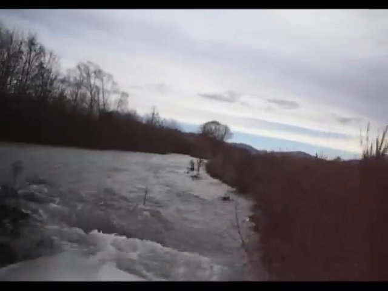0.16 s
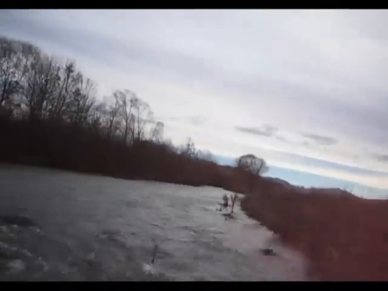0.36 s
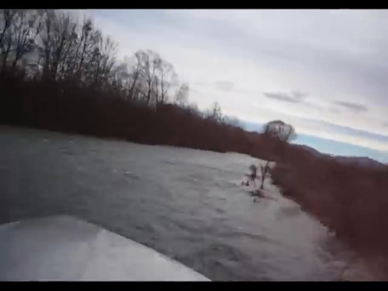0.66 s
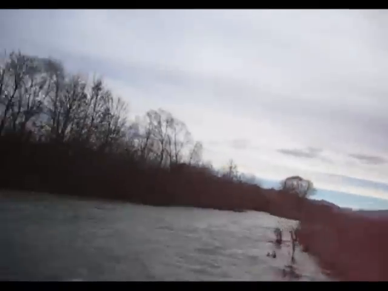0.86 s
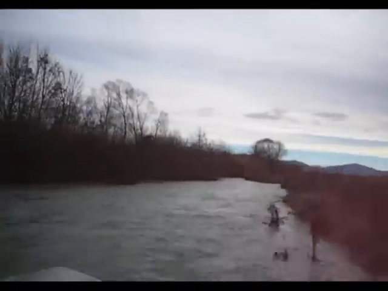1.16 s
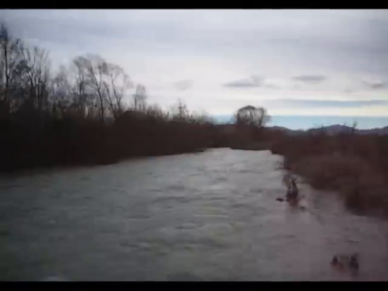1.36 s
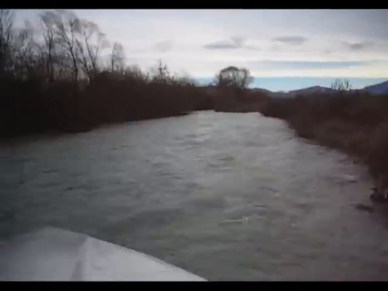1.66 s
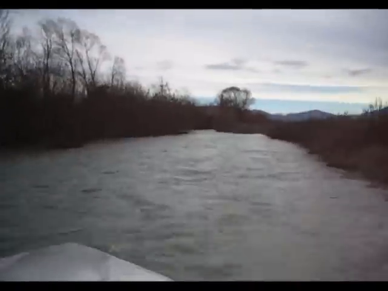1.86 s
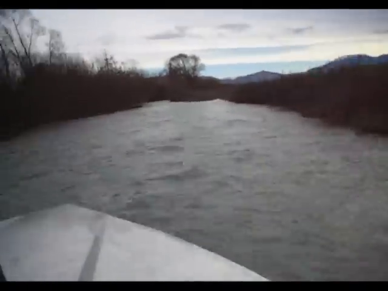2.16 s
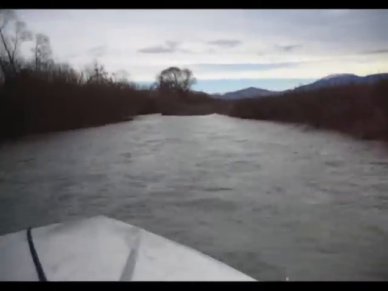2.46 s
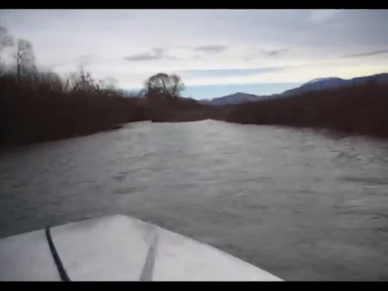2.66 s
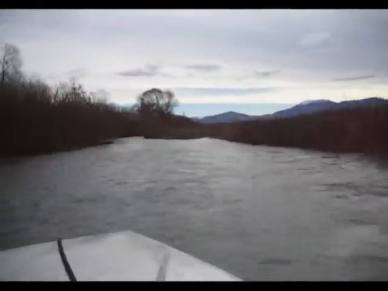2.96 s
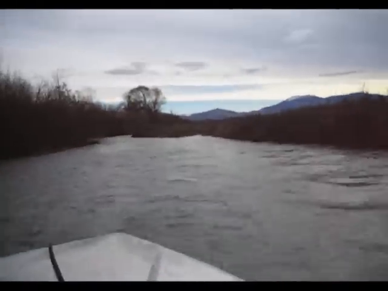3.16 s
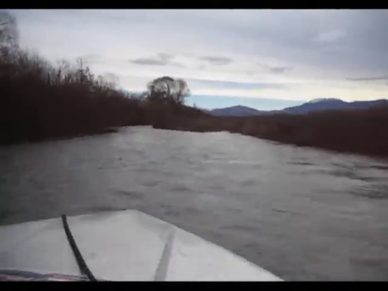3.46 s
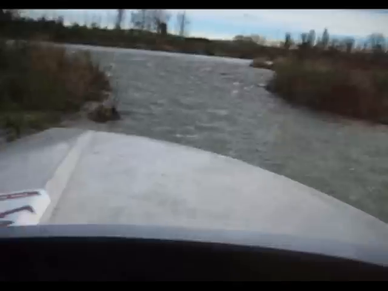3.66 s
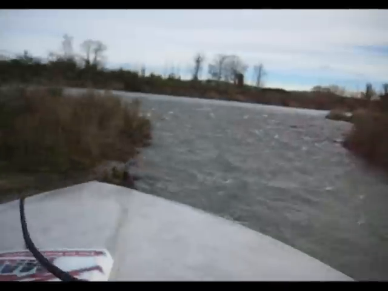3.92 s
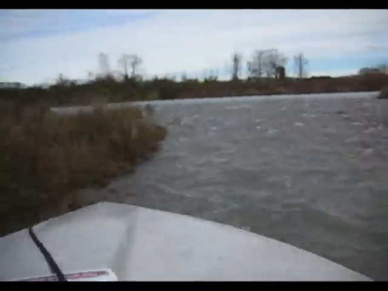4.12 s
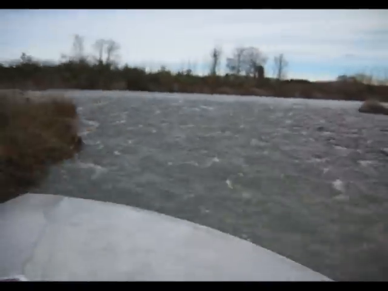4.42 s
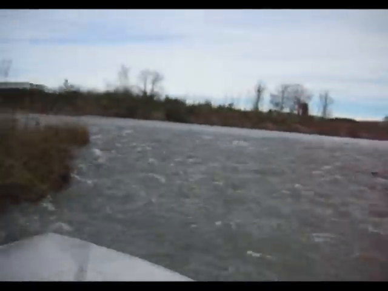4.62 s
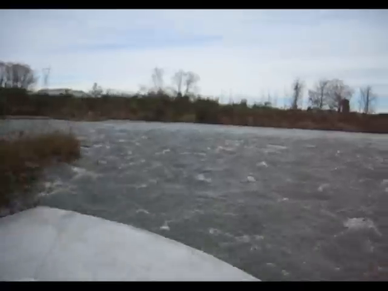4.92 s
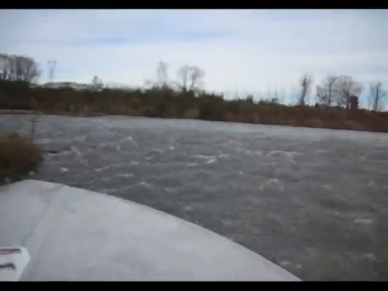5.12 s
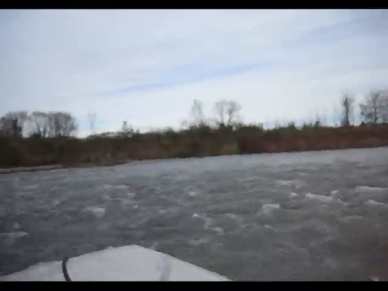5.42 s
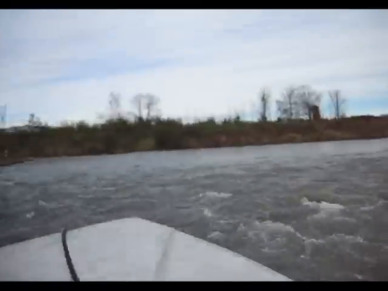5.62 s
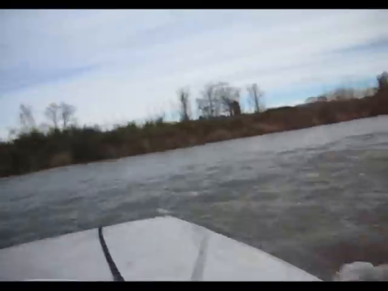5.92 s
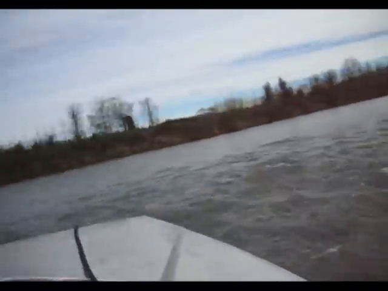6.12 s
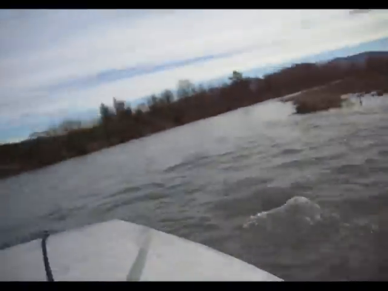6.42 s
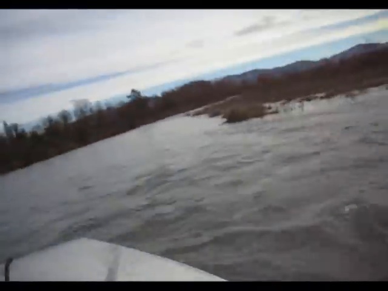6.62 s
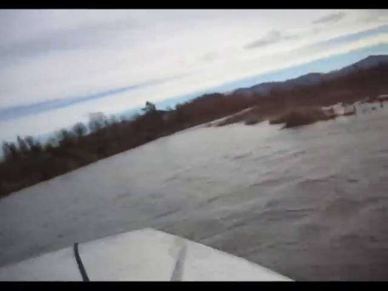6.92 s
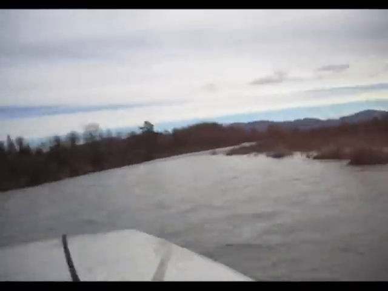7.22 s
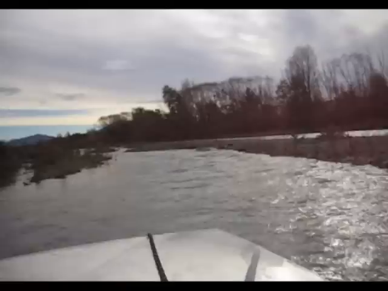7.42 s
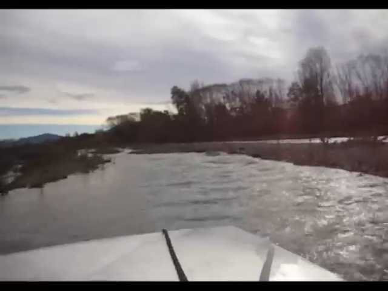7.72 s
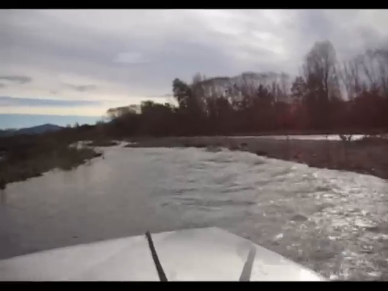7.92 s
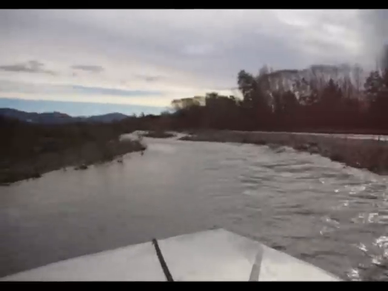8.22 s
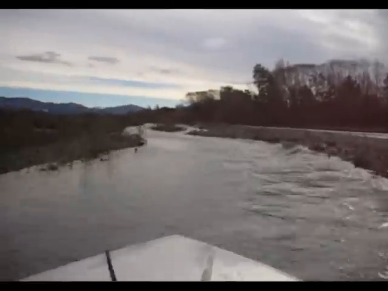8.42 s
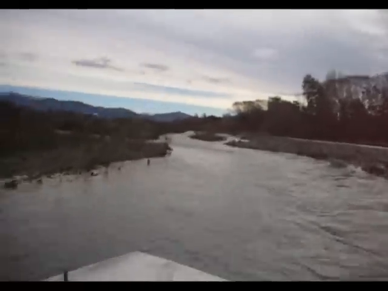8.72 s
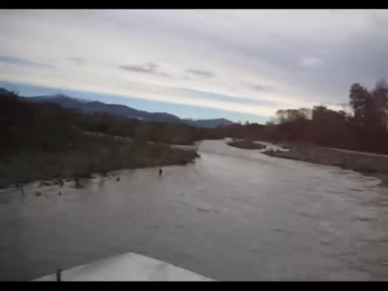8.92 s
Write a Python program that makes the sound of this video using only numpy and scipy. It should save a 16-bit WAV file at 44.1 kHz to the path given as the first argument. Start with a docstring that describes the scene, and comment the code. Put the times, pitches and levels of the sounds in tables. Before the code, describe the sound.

From an open cockpit, a V8 jet boat engine surges and falls in three abrupt shots, with whining impeller, rushing spray and overloaded thumps.

```python
"""A V8 growl holds, then climbs: a jet boat on a river, heard from its cockpit, in three shots with silent gaps.
Crank orders ring exhaust and hull; impeller blades whine; gas roars and rasps in a puff at each firing.
Spray hisses, wind and chop buffet the microphone as slow low noise, and the hull slams with a push and a splash.
Capsule and amplifier overload into flat tops when the sound is loud."""
import sys
import numpy as np
from scipy import signal
from scipy.fft import rfft, irfft, next_fast_len
from scipy.io import wavfile
from scipy.ndimage import uniform_filter1d

SR = 44100
rng = np.random.default_rng(int(sys.argv[2]) if len(sys.argv) > 2 else 0)


def master(y):
    """Save y as 16-bit WAV."""
    cut = np.clip(np.atleast_2d(y).T, -1, 1)
    pcm = np.round(cut * 32767)  # scale
    wavfile.write(sys.argv[1], SR, pcm.astype(np.int16))


N = 400428


def undb(db):
    """Amplitude factor of a level in dB."""
    return 10 ** (np.asarray(db) / 20)


def unit(x):
    """Scale to rms 1."""
    return x / np.sqrt(np.mean(x ** 2))


def walk(rate_hz):
    """Random levels, each held 1 / rate_hz seconds, smoothed twice; rms 1."""
    hold = int(SR / rate_hz)
    held = np.repeat(rng.standard_normal(N // hold + 1), hold)
    smooth = uniform_filter1d(uniform_filter1d(held, hold), hold)
    return unit(smooth[:N])


def coloured(spectrum, shared_db, own_db, rate_hz):
    """Noise of the given spectrum, rms 1, in octave-wide pieces that swell together and flicker alone."""
    hz, db = np.transpose(spectrum)
    size = next_fast_len(N)
    octave = np.log2(np.maximum(np.fft.rfftfreq(size, 1 / SR), 1))
    edges = np.log2(np.r_[hz[0] / 2, hz, hz[-1] * 2])
    shape_db = np.interp(octave, edges, np.r_[-60, db, -60])
    noise = rfft(rng.standard_normal(size)) * undb(shape_db)
    out, swell = 0, walk(rate_hz / 2)
    for centre in np.arange(np.floor(edges[0]), edges[-1] + 1):
        band = np.clip(1 - abs(octave - centre), 0, 1)
        piece = irfft(noise * band, size)[:N]
        out = out + piece * undb(shared_db * swell + own_db * walk(rate_hz))
    return unit(out)


def spans(t, rows):
    """Sum in dB of stretches (start_s, end_s, change_db) with 30 ms ramps inside their ends."""
    ramp_s = .03
    return sum(db * np.clip(np.minimum(t - start, end - t) / ramp_s, 0, 1) for start, end, db in rows)


def speed_slope(crank_hz):
    """Smoothed gain of crank speed, Hz per second."""
    return uniform_filter1d(np.gradient(crank_hz) * SR, size=2000)


# course of each shot: start_s, crank_hz, roar_db (less 1 dB when played), spray_db (plus 11 dB when played)
COURSE_1 = [(0.0, 59.9, -22, -40), (0.3, 60.34, -21.5, -40.5), (0.415, 62.96, -18.5, -35.5),
            (0.53, 74.56, -16.5, -32.5), (0.62, 78.3, -16.5, -30), (0.7, 80.3, -19.5, -28),
            (0.94, 82.33, -22.5, -28), (1.24, 81.74, -17, -30), (1.36, 57.64, -20, -43),
            (1.5, 40.24, -26, -44), (1.61, 36.8, -33, -44.5), (1.8, 51.04, -25.5, -44.5),
            (1.96, 54, -18, -39), (2.17, 49.9, -22.5, -40), (2.58, 48.52, -21.5, -41),
            (3.58, 49.8, -24, -39.5)]
COURSE_2 = [(3.73, 60.95, -22.5, -35), (4.0, 67.03, -15, -33.5), (4.13, 60.1, -15, -37),
            (4.23, 54.67, -26, -42), (4.72, 56.4, -20, -38.5), (4.8, 64.43, -17, -36.5),
            (4.87, 71.63, -14, -35.5), (4.971, 76.64, -17, -30.5), (5.1, 79.67, -22, -29.5),
            (5.3, 81.46, -16.5, -24.5), (5.36, 87.34, -15, -30.5), (5.44, 86.4, -15.5, -28.5),
            (5.55, 78.34, -18, -29.5), (5.6, 73.7, -20.5, -35.5), (5.69, 61.12, -23.5, -41),
            (5.87, 58.64, -22.5, -38), (6.04, 71.37, -14.5, -32), (6.13, 75.37, -14.5, -31.5),
            (6.3, 80.62, -15.5, -26.5), (6.55, 82.63, -15.5, -29.5), (6.66, 71.96, -13.5, -33),
            (6.77, 61.5, -13.5, -33.5), (6.9, 60.66, -17.5, -36.5), (7.07, 71.17, -13, -31),
            (7.16, 74.13, -15, -28), (7.3, 77.07, -19.5, -32), (7.39, 75.93, -21, -31.5)]
COURSE_3 = [(7.525, 54.87, -21, -38.5), (7.8, 53.86, -23, -38.5), (8.3, 53.78, -21, -39),
            (9.08, 53.06, -24, -40.5)]


def course(t):
    """Crank speed and the levels of gas roar and spray, interpolated over time."""
    start_s, *columns = np.transpose(COURSE_1 + COURSE_2 + COURSE_3)
    return [np.interp(t, start_s, column) for column in columns]


# tone levels over engine speed, before the changes below:
# crank_hz, shaft_shake_db, firing_db, impeller_db, impeller_third_harmonic_db, hull_drumming_db, intake_snarl_db
TONES_BY_SPEED = [(37.6, -37.5, -31, -25.5, -40, -23.5, -42), (48, -37, -21, -24, -43, -27, -39),
                  (48.62, -27.5, -23, -23.5, -26.5, -32, -32), (53.2, -22, -26.5, -29, -30.5, -31, -34),
                  (60.9, -31.5, -32, -28.5, -27.5, -22.5, -29.5),
                  (69.1, -18.5, -24.5, -22.5, -30, -23, -25), (74.2, -24, -26.5, -22.5, -33, -24, -24),
                  (76.7, -19.5, -17, -26.5, -28, -26.5, -26.5), (81, -24, -8, -29, -25.5, -31.5, -27),
                  (85.8, -20.5, -11.5, -20.5, -30.5, -30, -34)]
# firing tone sinks, or stands out (negative): start_s, end_s, drop_db
FIRING_DROPS = [(1.242, 1.65, 23), (1.65, 1.949, 9), (3.72, 4.03, 6), (4.078, 4.17, -10), (0.43, 0.5, -4),
                (4.72, 4.87, -7), (5.38, 5.483, -3), (5.51, 5.6, 6), (5.585, 5.799, 11), (6.536, 6.9, 19),
                (7.06, 7.4, 10), (7.5, 8.7, 1.5)]
# impeller tone stands out or sinks: start_s, end_s, rise_db
IMPELLER_SINGS = [(-0.03, 0.34, 6), (1.85, 2.202, -7), (3.3, 3.6, 3.5), (5.28, 5.52, -9),
                  (0.51, 0.63, 11.5), (1.642, 1.831, 10), (2.2, 2.5, 5.5), (3.74, 3.95, 4),
                  (2.85, 3.15, -3), (8.78, 9.11, -7), (7.5, 8.5, 5.5)]
# its third harmonic stands out or sinks: start_s, end_s, rise_db
WHINE_SINGS = [(0, 0.45, -4), (0.62, 1.235, 4.5), (5.62, 5.95, -5), (1.65, 2.2, -4), (2.301, 2.75, 1.5),
               (3.299, 3.599, -5.5), (3.851, 4.05, 6.5), (4.15, 4.7, -2.5), (7.5, 8.08, -3),
               (8.1, 8.468, 9), (8.5, 9.08, -3)]
PULL_DB, PULL_HZ_PER_S = 5, 72  # full rise of the firing tone, and the speed gain that brings it
SWELL_DB, SWELLS_PER_S = 1.0, 6


def tone_levels(t, crank_hz):
    """Levels in dB of six tones or groups set by engine speed; listed spans and speed gain shift firing."""
    speed_hz, *laws = np.transpose(TONES_BY_SPEED)
    shake_db, firing_db, impeller_db, whine_db, drum_db, snarl_db = (
        np.interp(crank_hz, speed_hz, law) for law in laws)
    pull_db = PULL_DB * np.clip(speed_slope(crank_hz) / PULL_HZ_PER_S, 0, 1)
    firing_db = firing_db + pull_db - spans(t, FIRING_DROPS)
    impeller_db = impeller_db + spans(t, IMPELLER_SINGS)
    whine_db = whine_db + spans(t, WHINE_SINGS)
    # these get an extra slow random swell, the firing does not
    shake_db, impeller_db, whine_db, drum_db, snarl_db = (
        db + SWELL_DB * walk(SWELLS_PER_S) for db in (shake_db, impeller_db, whine_db, drum_db, snarl_db))
    return shake_db, firing_db, impeller_db, whine_db, drum_db, snarl_db


def tone(turns, order, flutter_db, waver_db=1.5, wander=.35):
    """Sine at one multiple of the crank speed, wavering in level and phase."""
    phase = 2 * np.pi * (order * turns + rng.random()) + wander * np.sqrt(order) * walk(25)
    return np.sqrt(2) * np.sin(phase) * undb(waver_db * walk(12) + flutter_db * walk(40))


def main_tones(turns, slowing, flutter_db, shake_db, firing_db, impeller_db, whine_db):
    """Four firings, three impeller blades and one shaft shake a turn; their phases smear as the engine slows."""
    firing = tone(turns, 4, flutter_db, 1.5, wander=.08 + 0.3 * slowing)
    impeller = tone(turns, 3, flutter_db, 1.2, wander=0.15 + slowing)
    whine = tone(turns, 9, flutter_db, 2.0, wander=0.17 + slowing)
    shake = tone(turns, 1, flutter_db, 0.0, wander=0.18 + slowing)
    out = undb(firing_db) * firing + undb(impeller_db) * impeller
    return out + undb(whine_db) * whine + undb(shake_db) * shake


# tones that drum the hull: crank_multiple, level_db (re drumming)
HULL_DRUM = [(2, -2.5), (2.5, -3.5)]
# intake snarl: crank_multiple, level_db (re snarl)
INTAKE_SNARL = [(5, -3), (5.5, -1), (6, -1), (6.5, -6.5)]
# other tones of the uneven eight: crank_multiple, level_db (re roar_db of the course)
UNEVEN_ORDERS = [(1.5, -13.5), (3.5, -15), (4.5, -12.5), (7, -12), (7.5, -15.5), (8, -13.5), (10, -13.5),
                 (11, -15), (12, -21), (17, -16)]
# resonances that lift passing tones: centre_hz, width_hz, lift_db
EXHAUST_RESONANCES = [(121, 59, 3), (408, 87, 3.5), (757, 27, 1)]
# single orders stand out or sink: crank_multiple, start_s, end_s, rise_db
ORDER_SINGS = [(2, 0.34, 0.432, 6.5), (5, 0.41, 0.535, 9.5), (6, 0.333, 0.45, 9), (6, 0.48, 0.63, 6),
               (5.5, 0.39, 0.72, 6), (2.5, 2.82, 3.12, 8.5), (17, 2.1, 3.6, -9), (2, 3.82, 4.04, 4),
               (5.5, 3.7, 4.0, -11), (6, 3.72, 4.1, 2.5), (8, 3.72, 4.0, 5), (12, 3.8, 4.02, 11),
               (6, -0.03, 0.3, 4), (17, -0.03, 0.4, -7), (3.5, 4.07, 4.17, 10), (7, 0.97, 1.24, 4),
               (6, 7.9, 9.11, 3), (2, 7.5, 8.8, 2.5), (10, 8.2, 9.11, 4), (7, 4.72, 5.2, -6),
               (11, 4.92, 5.12, 7), (12, 4.75, 5.0, 5), (2, 5.48, 5.66, 5.5), (7, 5.55, 5.66, 8),
               (2, 4.25, 4.45, 6), (5, 4.74, 4.86, 11), (6, 4.83, 4.97, 6), (5.5, 4.84, 5.1, 5),
               (6, 5.46, 5.6, 5), (2, 5.74, 5.97, 6), (5, 5.99, 6.24, 9), (5.5, 6.06, 6.22, 4),
               (6, 6.54, 6.61, 8.5), (4.5, 4.74, 4.9, 6), (2, 6.86, 7.0, 5.5), (5, 6.93, 7.36, 5.5),
               (6, 7.08, 7.3, 3), (2.5, 7.14, 7.34, 7.5), (2, 7.14, 7.3, 6.5), (8, 7.14, 7.4, 4.5),
               (10, 7.12, 7.3, 5.5), (11, 7.5, 9.11, -4), (2.5, 8.45, 9.08, 7.5)]


def order_tones(t, crank_hz, turns, slowing, flutter_db, drum_db, snarl_db, roar_db):
    """Crank orders of hull, intake and uneven firing, lifted as they pass exhaust resonances."""
    ragged = 0.2 + 1.2997 * slowing
    out = 0
    for orders, level_db in (HULL_DRUM, drum_db), (INTAKE_SNARL, snarl_db), (UNEVEN_ORDERS, roar_db):
        for order, db in orders:
            lift_db = sum(top / (1 + (2 * (order * crank_hz - hz) / width) ** 2)
                          for hz, width, top in EXHAUST_RESONANCES)
            sings = [row[1:] for row in ORDER_SINGS if round(2 * row[0]) == round(2 * order)]
            gain = undb(db + lift_db + spans(t, sings) + level_db - 1.7 * slowing)
            out = out + gain * tone(turns, order, flutter_db, wander=ragged)
    return out


# gas roar spectrum: freq_hz, density_db (per Hz, relative)
ROAR_SPECTRUM = [(150, -5.5), (250, -2), (400, 2.5), (550, 0), (800, -2.5), (1200, -9.5), (2000, -26),
                 (3500, -26)]
# exhaust rasp spectrum, the upper middle of the roar: freq_hz, density_db (per Hz, relative)
RASP_SPECTRUM = [(700, -8.5), (900, -5), (1400, 1.5), (2000, -4), (3000, -8)]
# exhaust rasp level: time_s, level_db
RASP_LEVEL = [(0, -36), (0.23, -41), (0.6, -27), (1.22, -27), (1.34, -40), (1.58, -56), (1.84, -50),
              (1.89, -33.5), (2.29, -41), (3.2, -39), (3.57, -32.5), (3.74, -36.5), (3.99, -34),
              (4.24, -47), (4.74, -41), (4.98, -28), (5.47, -29), (5.77, -46), (6.06, -27), (6.5, -22.5),
              (6.79, -18.5), (6.88, -29.5), (7.17, -18.5), (7.38, -29.5), (7.54, -37.5), (8.28, -35.5),
              (9.08, -40)]


def exhaust_gas(t, phase, chance, roar_db):
    """Roar and rasp: noise in puffs that start at each firing and decay, of chance strength."""
    puffs = unit((0.63 + np.exp(-phase / 0.45)) * undb(1.3 * chance))
    rasp_db = np.interp(t, *np.transpose(RASP_LEVEL))
    roar = undb(roar_db - 1.0) * puffs * coloured(ROAR_SPECTRUM, 0.75, 1.4, 20)
    rasp = undb(rasp_db) * puffs * coloured(RASP_SPECTRUM, .6, 1.9, 30)
    return roar, rasp


HUNT_SHARE = 0.003985  # rms share by which the speed hunts
UNEVEN_DB, FLUTTER_DB = 2.0, 1.23  # firing scatter before smoothing, and tone flutter, at part speed
PART_HZ, FULL_HZ = 69.6, 80.8  # crank speeds between which the firings even out


def engine(t, steady_hz, roar_db):
    """One crank angle drives tones and gas puffs; the tones' firing scatter fades near full speed."""
    shake_db, firing_db, impeller_db, whine_db, drum_db, snarl_db = tone_levels(t, steady_hz)
    crank_hz = steady_hz * (1 + HUNT_SHARE * walk(8))
    turns = np.cumsum(crank_hz) / SR
    slowing = np.clip((-speed_slope(crank_hz) - 10) / 40, 0, 1)
    part = np.interp(crank_hz, [PART_HZ, FULL_HZ], [1, 0])
    flutter_db = FLUTTER_DB * part
    tones = main_tones(turns, slowing, flutter_db, shake_db, firing_db, impeller_db, whine_db)
    tones = tones + order_tones(t, crank_hz, turns, slowing, flutter_db, drum_db, snarl_db, roar_db)
    firing, phase = np.divmod(4 * turns, 1)
    chance = rng.standard_normal(N // 50)[firing.astype(int)]
    tones = tones * undb(UNEVEN_DB * part * uniform_filter1d(chance, size=60))
    roar, rasp = exhaust_gas(t, phase, chance, roar_db)
    # near full speed the firing rate meets the cockpit's boom, which lifts all but the rasp
    boom_db = 6 / (1 + ((4 * crank_hz - 332) / 28) ** 4)
    return undb(boom_db) * (tones + roar) + rasp


# spray spectrum: freq_hz, density_db (per Hz, relative)
SPRAY_SPECTRUM = [(700, 5), (1500, 1.5), (2500, -5.5), (3300, -5), (4500, -12.5), (6000, -16),
                  (8000, -15.5), (10000, -20)]


def spray(spray_db):
    """Water hiss: flickering noise that follows the course."""
    return undb(spray_db + 11.0) * coloured(SPRAY_SPECTRUM, 1.0, 1.0, 25)


# buffet spectrum: freq_hz, density_db (per Hz, relative)
BUFFET_SPECTRUM = [(25, -0.5), (40, 3.5), (55, -0.5), (80, -6.5), (120, -3), (180, -7.5), (300, -13)]
# base level of each shot (less 3 dB when played): level_db
SHOT_BUFFET = [-23.5, -20, -26]
# gusts and lulls: middle_s, half_length_s, rise_db
GUSTS = [(0.55, .06, 7), (0.95, .2, 1), (1.4, 0.18, 11.5), (1.9, 0.31, 7), (4.1, 0.23, 2.5),
         (4.9, 0.089, -8), (5.3, 0.098, -4), (5.5, .1, 9), (6.1, 0.14, 10.5), (6.95, 0.24, 8.5),
         (7.37, 0.12, 10.5), (7.97, .1, 6)]
# silence between shots: start_s, end_s
GAPS = [(3.5802, 3.7236), (7.3941, 7.5248)]


def buffet(t):
    """Wind and chop on the microphone: low noise at each shot's level, raised by gusts and lowered by lulls."""
    shot = np.searchsorted([end for _, end in GAPS], t)
    gust_db = sum(db * np.exp(-((t - middle) / half) ** 2) for middle, half, db in GUSTS)
    level_db = np.take(SHOT_BUFFET, shot) + gust_db
    return undb(level_db - 3.0) * coloured(BUFFET_SPECTRUM, 1.7, 0.88, 12)


# splash spectrum: freq_hz, density_db (per Hz, relative)
SPLASH_SPECTRUM = [(300, 11.5), (700, 2.5), (1500, -5), (3500, -15), (6000, -19)]
# hull slams on chop: turn_s (push gives way to swing), push_db, push_ms, splash_db (at turn_s, decaying),
# direction (1 in, -1 out)
SLAMS = [(1.398, -14, 5, -17, 1), (1.439, -13, 6.8, -17, 1), (1.807, -12, 6.6, -36, 1),
         (4.0985, -3, 5.5, -11, 1), (4.162, -2, 5.4, -20, 1), (6.828, -3, 6.2, -21, 1),
         (6.8388, -4, 4.5, -23, -1), (6.843, -5, 3.3, -25, -1), (6.852, -15, 3.03, -18, 1),
         (6.8835, -6, 4, -24, -1)]
SLAM_EDGE = 2.5  # how abruptly the push sets in and turns round


def slams(t):
    """Each slam pushes the diaphragm one way, lets it swing back once, then throws up a splash."""
    out = 0
    water = coloured(SPLASH_SPECTRUM, 0, 1, 40)
    for turn_s, push_db, push_ms, splash_db, way in SLAMS:
        # -1 to 0 is the push, 0 to 1 the quicker, weaker swing back
        u = np.clip((t - turn_s) * 1000 / push_ms * np.where(t > turn_s, 1.7, 1), -1, 1)
        swing = np.tanh(SLAM_EDGE * np.sin(np.pi * u)) * np.where(u > 0, .42, 1)
        out = out - np.sign(way) * undb(push_db) * swing
        out = out + undb(splash_db) * water * (u == 1) * np.exp(-abs(t - turn_s) / 0.016)
    return out


def scene():
    """Engine, spray, buffeting and slams summed, the same in both channels."""
    t = np.arange(N) / SR
    crank_hz, roar_db, spray_db = course(t)
    mono = engine(t, crank_hz, roar_db) + spray(spray_db) + buffet(t) + slams(t)
    return np.array([mono, mono])


def overload(x, top, knee):
    """Linear when small, flat at the top."""
    return x / (1 + abs(x / top) ** knee) ** (1 / knee)


def filtered(x, order, hz, kind="low"):
    """Butterworth filter."""
    return signal.sosfilt(signal.butter(order, hz, kind, fs=SR, output="sos"), x)


CAPSULE_TOP, CAPSULE_KNEE = 0.6, 4.9
AMP_TOP, AMP_KNEE = 0.45, 7.6
TOP_HZ = 15585


def record(dry):
    """Capsule and amplifier overload, coupling capacitors tilt the flat tops, half-rate sampling adds a mirror image."""
    x = overload(dry[0] * undb(1.5), CAPSULE_TOP, CAPSULE_KNEE)
    x = filtered(x, 2, 40, "high")
    x = overload(x, AMP_TOP, AMP_KNEE)
    x = filtered(x, 1, 25, "high")
    x = filtered(x, 1, 3500)
    x = filtered(x, 6, 9800)
    # sound just under a quarter of the sample rate comes back mirrored above it
    mirror = filtered(x * (-1) ** np.arange(N), 8, [11300, 13900], "band")
    converter_hiss = filtered(rng.standard_normal(N), 8, 13500)
    x = x + undb(-8.5) * mirror + undb(-54.0) * converter_hiss
    t = np.arange(N) / SR
    for start, end in GAPS:
        x = x * np.clip(np.maximum((start - t) / .0004, (t - end) / .003), 0, 1)
    # a faint grain has opposite sign in the two channels
    grain = x * rng.standard_normal(N) * undb(4.0 * walk(20))
    grain = undb(-37.0) * filtered(grain, 2, 3000) + undb(-55.0) * grain
    grain = filtered(grain, 8, 13500)
    pair = np.array([x + grain, x - grain])
    return signal.sosfilt(signal.ellip(8, .2, 70, TOP_HZ, fs=SR, output="sos"), pair)


dry = scene()
out = record(dry)
master(out)
```